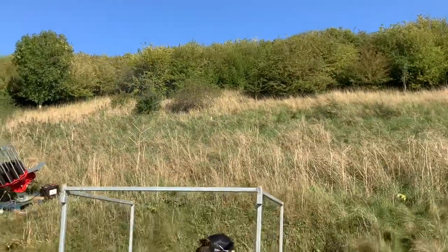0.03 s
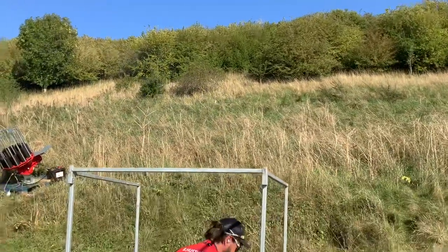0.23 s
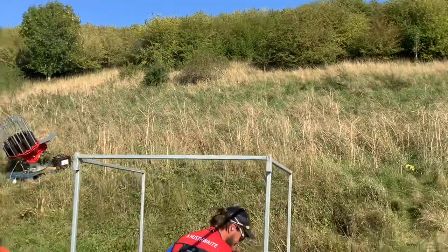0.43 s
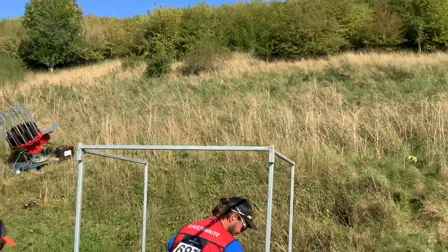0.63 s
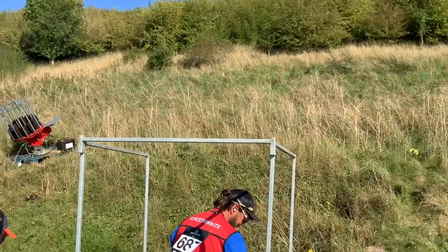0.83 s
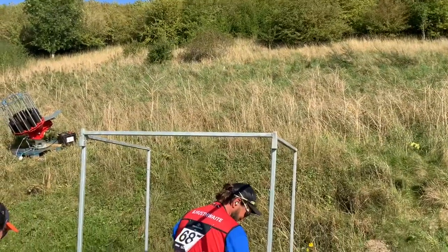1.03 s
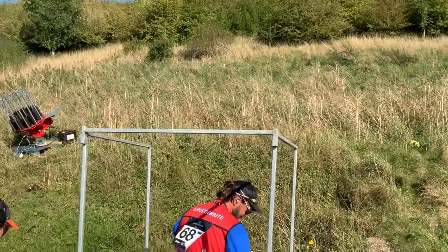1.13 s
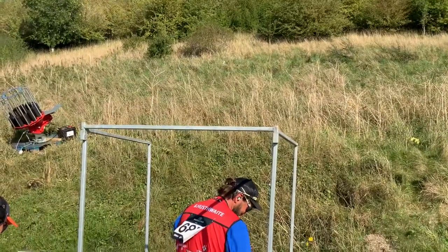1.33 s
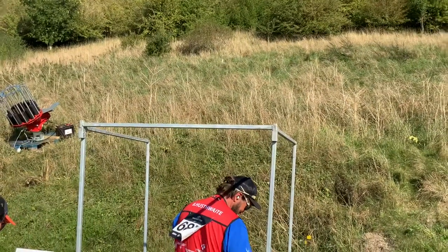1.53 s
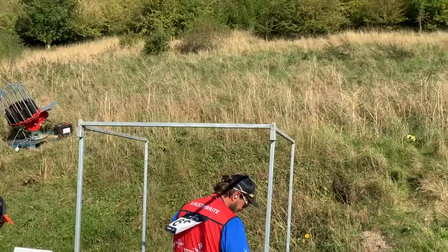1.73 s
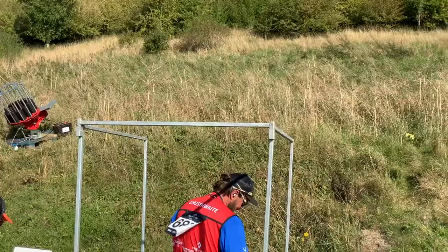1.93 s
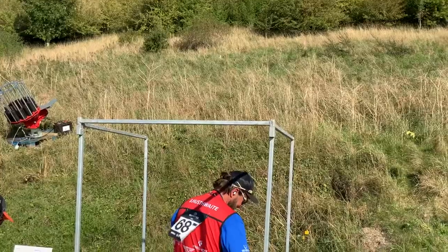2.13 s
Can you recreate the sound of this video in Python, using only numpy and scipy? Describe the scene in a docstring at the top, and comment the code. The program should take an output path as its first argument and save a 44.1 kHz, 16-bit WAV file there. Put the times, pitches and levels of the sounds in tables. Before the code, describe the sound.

A shotgun fires twice, about a second and a half apart, a few metres from the microphone. Each sharp bang echoes off a grassy hillside and woods. Faint gun clicks and clothing rustles sit over a low distant hum.

```python
"""Two shotgun shots at a clay shooting ground, a few metres away and facing a grassy hillside.
Each shock wave and its bounce off the ground overload the microphone and ring the steel shooting stand.
The grass hisses back, the slope returns a broad echo and the woods add a long tail.
The gun clicks and clothing rustles over open air and the low hum of a distant motor."""
import sys
import numpy as np
from scipy import signal
from scipy.fft import rfft, irfft
from scipy.io import wavfile

SR = 44100
rng = np.random.default_rng(int(sys.argv[2]) if len(sys.argv) > 2 else 0)


def file_out(sig):
    """Save sig as 16-bit WAV at sys.argv[1]."""
    # one column per channel
    cols = np.atleast_2d(sig).T
    # limit, then scale
    lim = np.clip(cols, -1, 1)
    pcm = np.round(lim * 32767).astype(np.int16)
    wavfile.write(sys.argv[1], SR, pcm)


N = 97020

# tone of the echo from each part of the land: (frequency [Hz], level [dB])
NEAR = [(30, -3.5), (90, -14), (200, -7), (430, 2), (1200, -2.5), (2200, -9), (4500, -18.5), (7500, -18.5),
        (10000, -27), (16000, -34.5)]
GRASS = [(40, -16), (170, -16), (420, -3.5), (900, 3.5), (2000, -3.5), (4000, -1.5), (6500, -6),
         (9000, -15), (13000, -24), (16000, -33)]
SLOPE = [(60, -43), (250, -26.5), (440, -4), (850, 2.5), (1400, -2.5), (2200, -7), (3500, -18.5),
         (6500, -19.5), (9000, -54.5), (16000, -69)]
WOODS = [(100, -48), (320, -16), (510, -1), (720, -4.5), (1150, -2.5), (1560, 1), (1900, -4.5),
         (3300, -13.5), (6000, -57), (12000, -66)]
LEAVES = [(300, -44), (1500, -34.5), (3000, 9), (5000, 0.5), (7500, -7), (10000, -18), (15000, -60)]


def undb(db):
    """Turn decibels into a gain."""
    return 10 ** (np.asarray(db) / 20)


def add(out, start, x):
    """Mix x into out from a start time in seconds."""
    i = int(round(max(start, 0) * SR))
    out[i:i + len(x)] += x[:max(len(out) - i, 0)]


def shaped(gain):
    """Noise of strength 1, shaped by one gain for each frequency."""
    x = irfft(rfft(rng.standard_normal(N)) * gain, N)
    return x / x.std()


def noise(points):
    """Noise of strength 1 whose tone follows (frequency [Hz], level [dB]) points."""
    hz, db = np.array(points).T
    freqs = np.fft.rfftfreq(N, 1 / SR) + 1
    return shaped(undb(np.interp(np.log(freqs), np.log(hz), db)))


def band(hz, octaves=1.05, dull_hz=6000):
    """Noise of strength 1 in a broad band around hz, dull at the very top."""
    freqs = np.fft.rfftfreq(N, 1 / SR) + 1
    hump = np.exp(-(np.log2(freqs / hz) / octaves) ** 2)
    return shaped(hump / np.sqrt(1 + (freqs / dull_hz) ** 8))


def wander(rate_hz):
    """A smooth random drift around zero, typically of size 1."""
    x = shaped(np.exp(-(np.fft.rfftfreq(N, 1 / SR) / rate_hz) ** 2))
    return x - x.mean()


def fade(t, fade_s):
    """Stay at 1 until t = 0, then fall by 60 dB in each fade time."""
    return np.exp(-np.log(1000) * np.maximum(t, 0) / fade_s)


def open_air():
    """Outdoor air: a low rumble and faint hiss that waver slightly."""
    # tone of the air: (frequency [Hz], level [dB])
    air_tone = [(15, -10.5), (25, 2.5), (55, -1.5), (78, -18.5), (190, -19.5), (400, -21.5), (700, -24),
                (950, -15.5), (1400, -24), (2400, -31.5), (4000, -38.5), (8000, -46), (15000, -50.5)]
    return undb(-57.5 + .6 * wander(rate_hz=6)) * noise(air_tone)


def motor_hum(t, waver_db=3):
    """A distant motor hums with two low tones that waver in loudness."""
    # tones of the hum: (frequency [Hz], level [dB])
    tones = [(51, -60.5), (100.5, -73)]
    out = np.zeros(N)
    for hz, db in tones:
        peak = np.sqrt(2) * undb(db + waver_db * wander(rate_hz=16))
        out += peak * np.sin(2 * np.pi * (hz * t + rng.random()))
    return out


def clothing_rustles(t, grain_db=4):
    """Moving cloth makes grainy swishes that swell and die away."""
    # swishes: (time of peak [s], half length [s], level [dB], centre frequency [Hz])
    rustles = [(0.13, 0.075, -69.5, 4630), (0.509, 0.017, -58, 5100), (0.617, 0.057, -65.5, 5560),
               (.725, 0.027, -64, 3900), (0.877, 0.05, -69.5, 4170), (0.985, 0.019, -63.5, 3300),
               (1.19, 0.032, -81.5, 5000), (1.418, 0.031, -68.5, 3470), (1.49, 0.016, -59, 3900)]
    grain = undb(grain_db * wander(rate_hz=250))
    out = np.zeros(N)
    for peak, half_length, db, hz in rustles:
        swell = np.exp(-((t - peak) / half_length) ** 2)
        out += undb(db) * band(hz) * swell
    return out * grain / grain.mean()


def gun_clicks(t):
    """Parts of the gun and gear touch: a sharp tick, then a softer rattle."""
    # clicks: (time [s], level [dB], centre frequency [Hz], rattle fade time [s])
    clicks = [(0.06, -58, 4200, .04), (.092, -55.5, 4170, .04), (0.134, -61.5, 5860, 0.023),
              (0.155, -47.5, 4360, 0.013), (0.456, -47, 4630, 0.019), (0.559, -53, 5860, 0.024),
              (.627, -46.5, 4830, 0.035), (.878, -58.5, 4500, 0.041), (.961, -55, 4170, 0.027),
              (1.387, -56.5, 3670, 0.079), (1.4088, -43, 3150, 0.046), (1.44, -63, 4460, 0.046),
              (1.48, -56, 3000, .07), (1.491, -58, 1300, 0.042)]
    tick = fade(t, fade_s=.009)
    out = np.zeros(N)
    for start, db, hz, fade_s in clicks:
        rattle = undb(-9) * fade(t, fade_s)
        add(out, start, undb(db) * band(hz) * (tick + rattle))
    return out


def stand_ring(t):
    """The steel shooting stand, hit by the shock, rings with a few high tones."""
    # tones of the steel: (frequency [Hz], level [dB], fade time [s])
    tones = [(3340, 1.5, .07), (3199, 8, .07), (3420, -6.5, .06), (2590, -26.5, .06), (6800, -7, .05)]
    return sum(undb(db) * np.sin(2 * np.pi * hz * t) * fade(t, fade_s) for hz, db, fade_s in tones)


def land_echoes(t, shot_count, alike_share=0.54, tree_line_s=.368):
    """The land scatters each shot back as fading noise; gives one echo a shot, all partly alike."""
    # echo paths: (tone table, delay [s], rise [s], hold [s], fade time [s], level [dB])
    paths = [(NEAR, 0.0014, 0.0048, 0.0083, 0.071, -21.5), (GRASS, .015, 0.013, 0.12, 0.25, -35.5),
             (SLOPE, .078, 0.028, 0.054, 0.23, -29), (WOODS, 0.17, 0.035, 0.076, 1.373, -48.5),
             (LEAVES, 0.05, 0.058, 0.16, 0.73, -55.5)]
    shared_noises = [noise(path[0]) for path in paths]
    flutter = undb(wander(rate_hz=130) * np.clip(t / .03, 0, 1))  # uneven by about 1 dB
    tree_line = undb(-46) * (t > tree_line_s) * fade(t - tree_line_s, fade_s=0.093) * noise(WOODS)
    echoes = []
    for _ in range(shot_count):
        echo = tree_line.copy()
        for shared, (tone, delay, rise, hold, fade_s, db) in zip(shared_noises, paths):
            swell = np.clip((t - delay) / rise, 0, 1) * fade(t - delay - rise - hold, fade_s)
            scatter = np.sqrt(alike_share) * shared + np.sqrt(1 - alike_share) * noise(tone)
            echo += undb(db) * swell * scatter
        echoes.append(flutter * echo)
    return echoes


def gas_roar(t, rise_s, hold_s=.003):
    """Gas swirling out of the barrel makes a very short burst of noise."""
    # tone of the gas: (frequency [Hz], level [dB])
    gas_tone = [(100, -20.5), (600, -10.5), (1200, 5), (2000, 3), (3200, -1.5), (4300, -15), (6800, -3),
                (9000, -16), (11000, -28.5), (16000, -37)]
    return np.clip(t / rise_s, 0, 1) * fade(t - hold_s, fade_s=.009) * noise(gas_tone)


def blast_wave(t, push_s):
    """Air pressure jumps up, then falls through zero after push_s into a weaker suction."""
    progress = np.maximum(t, 0) / push_s
    jump = np.clip(t * SR / 2, 0, 1)
    return jump * (1 - progress) * np.exp(-progress)


def shotgun_shots(t, crack_lead_s=.0006, suction_half_s=0.00043):
    """A small crack, then the shock, its ground bounce, suction and gas; stand and land answer."""
    # shots: (time [s], crack [dB], shock [dB], push length [s], bounce delay [s], bounce gain [-1..1],
    # suction delay [s], suction [dB], gas roar [dB], stand ring [dB], echo [dB])
    shots = [(0.2085, -30, 7.5, 0.00025, .00156, 0.95, .00284, -7, -12, -23.5, 0),
             (1.6882, -32, 13.5, 0.00029, 0.001464, -0.69, .0021, -9.5, -11.5, -35, 0.5)]
    echoes = land_echoes(t, len(shots))
    ring = stand_ring(t)
    out = np.zeros(N)
    for shot, echo in zip(shots, echoes):
        (start, crack_db, shock_db, push_s, bounce_s, bounce_gain,
         suction_s, suction_db, roar_db, ring_db, echo_db) = shot
        shock = blast_wave(t, push_s) + bounce_gain * blast_wave(t - bounce_s, push_s)
        suction = np.exp(-((t - suction_s) / suction_half_s) ** 2)
        bang = undb(shock_db) * shock - undb(suction_db) * suction + undb(roar_db) * gas_roar(t, push_s)
        add(out, start - crack_lead_s, -undb(crack_db) * blast_wave(t, push_s))
        add(out, start, undb(ring_db) * ring + undb(echo_db) * echo - bang)
    return out


def scene():
    """Shots, clicks, rustles and background meet at one microphone."""
    t = np.arange(N) / SR
    return (shotgun_shots(t) + gun_clicks(t) + clothing_rustles(t) + open_air() + motor_hum(t))[None]


def record(dry, bass_hz=45, top_hz=15500, ceiling=.92):
    """The microphone thins the deep bass, flattens the shocks and cuts the highest treble."""
    bass_cut = signal.butter(1, bass_hz, "high", fs=SR, output="sos")
    treble_cut = signal.ellip(8, .2, 80, top_hz, fs=SR, output="sos")
    thinned = signal.sosfilt(bass_cut, dry)
    flattened = ceiling * np.tanh(thinned / ceiling)
    return signal.sosfilt(treble_cut, flattened)


dry = scene()
out = record(dry)
file_out(out)
```